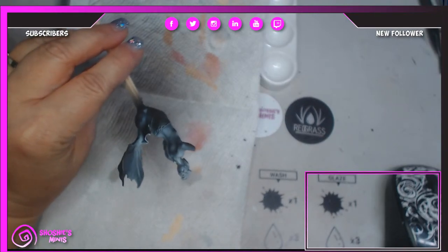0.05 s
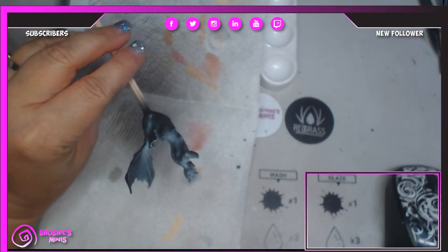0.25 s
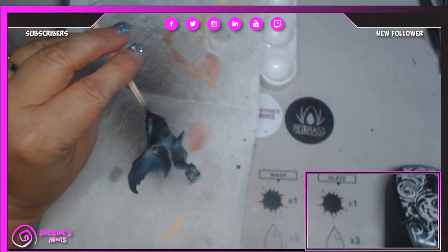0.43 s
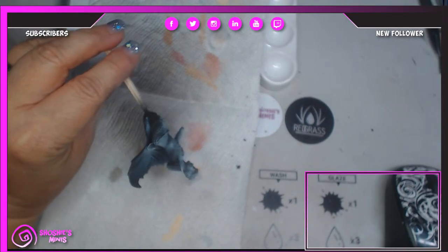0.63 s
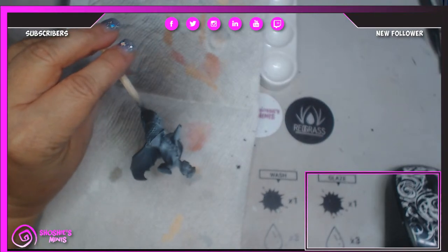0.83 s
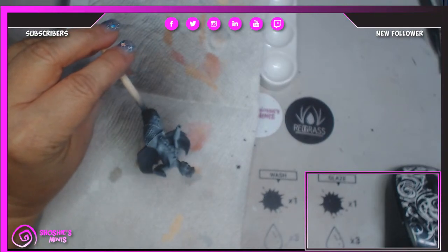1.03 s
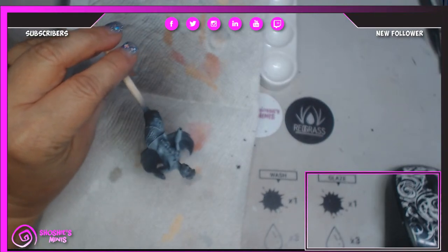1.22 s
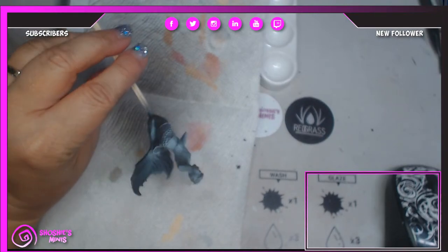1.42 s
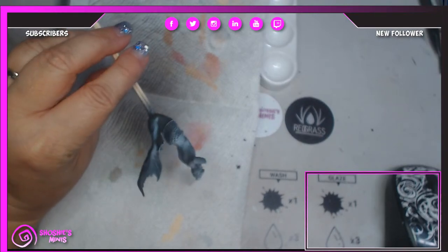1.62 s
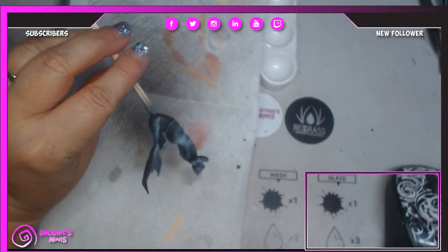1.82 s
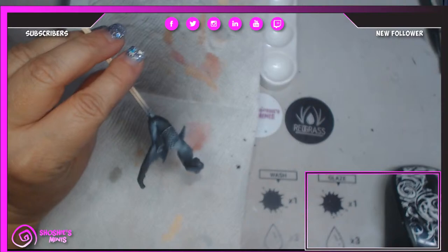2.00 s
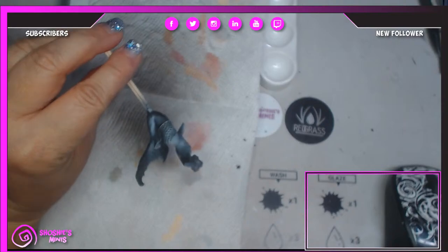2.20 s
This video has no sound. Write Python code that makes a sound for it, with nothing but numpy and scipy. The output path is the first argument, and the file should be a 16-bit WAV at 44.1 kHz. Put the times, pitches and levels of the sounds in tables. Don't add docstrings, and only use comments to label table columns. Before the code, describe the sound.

An airbrush is already hissing close to a desk microphone, a thin band of bright air without deep body, growing slightly until 1.1 s, over faint low nudges in the first 0.2 s. It drops abruptly to a weak, fluttering leak that fades further. From 1.6 to 2.1 s low desk thumps come, strongest near 1.8 s, with tiny high spits. The hiss is gated off after 2.07 s; full silence from about 2.2 s.

```python
import sys
import numpy as np
from scipy import signal
from scipy.fft import rfft, irfft, next_fast_len
from scipy.io import wavfile
from scipy.ndimage import uniform_filter1d, map_coordinates

SR = 44100
rng = np.random.default_rng(int(sys.argv[2]) if len(sys.argv) > 2 else 0)


def generate_wav(signal):
    frames = np.transpose(np.atleast_2d(signal))
    scaled = np.clip(frames, -1, 1) * 32767
    pcm = np.round(scaled).astype(np.int16)
    wavfile.write(sys.argv[1], SR, pcm)


N = 99269

# (time [s], level [dB])
TRIGGER_HISS = [(0, -50), (0.499, -48.5), (1.082, -46), (1.1, -61), (1.201, -62), (1.299, -63),
                (1.418, -64.5), (1.559, -69), (1.718, -69), (1.78, -66.5), (1.93, -66.5), (2.1, -69)]
# (frequency [Hz], density [dB per Hz])
FULL_JET_SPECTRUM = [(1120, -103.5), (1900, -62.5), (2220, -19), (2590, -11.5), (3510, -11.5),
                     (4000, -10.5), (6370, 0.5), (7490, -6), (7900, -36.5), (10300, -71.5), (17400, -120)]
# (frequency [Hz], density [dB per Hz])
LEAK_SPECTRUM = [(1290, -70.5), (2200, -35.5), (2880, -14), (3720, -16), (3940, -4.5), (4840, -13.5),
                 (7130, 1), (7480, -5), (7800, -31), (10100, -56.5), (17200, -120)]
# (frequency [Hz], width [Hz], level [dB], drift [dB per s])
FULL_JET_CAP = [(2870, 150, -14, 1.5), (4070, 360, -7, -1), (4445, 300, -9.5, -1), (5520, 490, -3, 1),
                (6120, 210, -7, -0.5), (6498, 300, 1.5, -1.5), (7080, 150, -5.5, 0), (7338, 220, -4, -0.5)]
# (frequency [Hz], width [Hz], level [dB], drift [dB per s])
LEAK_CAP = [(2925, 200, -19, 10), (3427, 170, -20, 7), (3967, 120, -9.5, 10.5), (4494, 170, -12, -5),
            (5384, 310, -9.5, -10), (5870, 120, -5, 2), (6530, 230, -0.5, -11), (7184, 380, -3, 3)]
# (time [s], length [s], share [0-1])
EDGE_BITES = [
    (.04, .2, .8),
    (.27, .1, .5),
    (.57, .07, .95),
    (.7, .05, .6),
    (1.14, .5, .85),
]
# (time [s], length [s], level [dB])
WHISTLES = [
    (0, 0.22, -87.5),
    (0.316, 0.076, -94),
    (0.599, 0.082, -88.5),
    (0.778, 0.21, -87),
]
# (time [s], level [dB])
DESK_SPELLS = [
    [(0, -56), (.09, -68.5), (.2, -69), (.236, -74), (.34, -69), (.42, -93.5), (.5, -106)],
    [(1.572, -105), (1.588, -62), (1.63, -50), (1.7, -56.5), (1.8, -52.5), (1.85, -47.5), (2.07, -53.5),
     (2.13, -75.5), (2.24, -102)],
]
# (frequency [Hz], density [dB per Hz])
RUMBLE_SPECTRUM = [(15, -45.5), (25, -17), (48, -6.5), (70, 9), (97, -6), (151, -6), (200, -22.5),
                   (260, -45.5), (440, -120)]
# (frequency [Hz], density [dB per Hz])
RATTLE_SPECTRUM = [(100, -30.5), (170, -1.5), (194, -2), (378, -23), (412, -23.5), (480, -52.5), (620, -81),
                   (1060, -120)]
# (time [s], peak level [dB], frequency [Hz])
DESK_NUDGES = [(.003, -53, 100), (.04, -52, 90), (.07, -57, 70), (.119, -51, 70), (.163, -53, 70),
               (.199, -51, 90), (1.6, -50, 100), (1.636, -44, 80), (1.667, -47, 70), (1.718, -51, 80),
               (1.749, -44, 80), (1.769, -45, 85), (1.8, -34, 78), (1.819, -43, 80), (1.847, -43, 95),
               (1.885, -39, 85), (1.914, -49, 90), (1.955, -46, 100), (1.982, -48, 90), (2.015, -45, 90),
               (2.034, -47, 90), (2.058, -47, 120), (2.084, -50, 80)]
# (time [s], length [s], level [dB], frequency [Hz])
ROOM_FLICKERS = [(.001, .12, -86, 608), (.011, .07, -97, 1150), (.05, .14, -92, 2150), (.18, .07, -99, 750),
                 (.2, .07, -97, 620), (.31, .05, -100, 610), (.46, .14, -90, 2040), (.5, .05, -94, 1070),
                 (.52, .05, -92, 650), (.58, .07, -89, 620), (.64, .06, -96, 1090), (.645, .19, -89, 770),
                 (.65, .12, -94, 2040), (.66, .17, -89, 610), (.745, .05, -96, 1170),
                 (1.12, .04, -102, 1120), (1.27, .04, -107, 1120), (1.44, .05, -89, 1140),
                 (1.94, .03, -96, 750), (2.166, .022, -87, 1150), (2.19, .035, -101, 1150)]
# (time [s], length [s], level [dB], frequency [Hz])
PAINT_SPURTS = [
    (1.61, .03, -68, 6550),
    (1.66, .04, -60, 6600),
    (1.72, .06, -63, 7250),
    (1.835, .03, -65, 6500),
    (1.912, .03, -58, 7280),
    (2.04, .04, -69, 7300),
    (1.075, .025, -84, 7950),
]
# (frequency [Hz], density [dB per Hz])
FLOOR_SPECTRUM = [(20, -8), (2000, 0.5), (8000, -6), (11000, -3.5), (15900, 4), (16100, -6.5),
                  (22000, -3.5)]

EASE_S, EASE_LEN_S = 1.092, 0.0034
AFTER_DB, AFTER_DB_PER_S = -64, 90
JET_LOW_HZ, JET_TOP_HZ, BITE_HZ = 2130, 7800, 2520
WANDER, WANDER_RATE = .008, 7
WHISTLE_HZ, WHISTLE_WIDTH_HZ = 8580, 100
RUMBLE_DB, STAND_HZ = -8, 32
RATTLE_DB, RATTLE_GROWS, RATTLE_S = -20.5, 1.74, 0.015
SUPPRESS_DB = -92.5
NUDGE_CYCLES, NUDGE_SKEW_RAD = .8, .6
FLICKER_DB, HUM_HZ, HUM_DB = -0.5, 60, -115
SPURT_DB, SPURT_WIDTH_HZ = -0.5, 49
GATE_S, GATE_DB_PER_S, END_S = 2.072, 551.5, 2.225
FLOOR_DB, FLOOR_SIDE_DB = -99, -29.5


def amp(db):
    return 10 ** (np.asarray(db) / 20)


def unit(x):
    return x / np.sqrt(np.mean(x ** 2) + 1e-20)


def along(points, x, warp=np.log1p):
    places, levels = np.transpose(points)
    return np.interp(warp(x), warp(places), levels, left=-150, right=-150)


def clock():
    return np.arange(N) / SR


def wobble(rate):
    knots = rng.standard_normal(int(N * rate / SR) + 4)
    return map_coordinates(knots, [np.arange(N) * rate / SR])


def swell(start, length):
    return np.sin(np.pi * np.clip((clock() - start) / length, 0, 1)) ** .5


def through(x, gain):
    size = next_fast_len(N + 8192)
    return irfft(rfft(x, size) * gain(np.fft.rfftfreq(size, 1 / SR)), size)[:N]


def coloured(gain):
    return unit(through(rng.standard_normal(N), gain))


def shaped(spectrum):
    return coloured(lambda f: amp(along(spectrum, f)))


def band(hz, width_hz):
    return coloured(lambda f: np.exp(-((f - hz) / width_hz) ** 2))


def smooth(cells, bins, frames):
    return uniform_filter1d(uniform_filter1d(cells, size=bins, axis=0), size=frames, axis=1)


def patchy(x, patchy_db):
    cells = signal.stft(x, nperseg=512)[2]
    patches = unit(smooth(rng.standard_normal(cells.shape), 4, 8))
    return unit(signal.istft(cells * amp(patchy_db * patches), nperseg=512)[1][:N])


def wandering(x):
    return map_coordinates(x, [np.cumsum(1 + WANDER * wobble(WANDER_RATE))], mode="mirror")


def suppressed(x, under_db):
    cells = signal.stft(x, nperseg=1024, noverlap=768)[2]
    size = smooth(np.abs(cells), 3, 3) + 1e-12
    kept = cells * np.clip(1 - amp(under_db) / size, 0, 1)
    return signal.istft(kept, nperseg=1024, noverlap=768)[1][:N]


def jet(spectrum, cap, middle_s, cap_db, waver_db, rate, patchy_db):
    air = patchy(shaped(spectrum), patchy_db)
    rings, ring_power = 0, 0
    for hz, width, db, drift in cap:
        level = amp(db + drift * (clock() - middle_s))
        waver = unit(amp(waver_db * wobble(rate)))
        rings = rings + level * waver * np.sqrt(width) * wandering(band(hz, 0.59 * width))
        ring_power += amp(2 * db) * width
    return (air + amp(cap_db) * rings / np.sqrt(ring_power)) / np.sqrt(1 + amp(2 * cap_db))


def airbrush_hiss():
    t = clock()
    weak = np.clip((t - EASE_S) / EASE_LEN_S, 0, 1)
    full = jet(FULL_JET_SPECTRUM, FULL_JET_CAP, middle_s=0.18, cap_db=-2, waver_db=-0.5, rate=25, patchy_db=3.5)
    full = full * amp(0.72 * wobble(60))
    leak = jet(LEAK_SPECTRUM, LEAK_CAP, middle_s=1.553, cap_db=4.5, waver_db=1.5, rate=28, patchy_db=4.5)
    leak = leak * amp(1.4 * wobble(45))
    times, levels = np.transpose(TRIGGER_HISS)
    hiss = amp(np.interp(t, times, levels)) * ((1 - weak) * full + weak * leak)
    hiss += weak * full * amp(AFTER_DB - AFTER_DB_PER_S * np.abs(t - EASE_S))

    lower_edge = through(hiss, lambda f: np.clip((BITE_HZ - f) / 200, 0, 1))
    bitten = lower_edge * sum(share * swell(s, length) for s, length, share in EDGE_BITES)

    def pass_band(f):
        return np.clip((JET_TOP_HZ - f) / 150, 0, 1) * np.clip((f - JET_LOW_HZ) / 120, 0, 1)
    return through(hiss - bitten, pass_band)


def whistle():
    level = sum(amp(db) * swell(s, length) for s, length, db in WHISTLES)
    return band(WHISTLE_HZ, WHISTLE_WIDTH_HZ) * level


def desk():
    t = clock()
    spells = [along(spell, t, warp=np.asarray) for spell in DESK_SPELLS]
    db = uniform_filter1d(np.maximum(*spells), size=300)
    rumble = amp(db + RUMBLE_DB) * shaped(RUMBLE_SPECTRUM)
    shaken, nudges = amp(db - 3), 0
    for s, peak_db, hz in DESK_NUDGES:
        since = t - s
        shaken = shaken + amp(RATTLE_GROWS * (peak_db + 43) - 45) * np.exp(-(since / RATTLE_S) ** 2)
        bump = np.exp(-(since * hz / NUDGE_CYCLES) ** 2)
        nudges = nudges - amp(peak_db) * bump * np.cos(2 * np.pi * hz * since - NUDGE_SKEW_RAD)
    rattle = amp(RATTLE_DB + 1.9 * wobble(30)) * shaken * shaped(RATTLE_SPECTRUM)
    thumps = rumble + suppressed(rattle, SUPPRESS_DB) + nudges
    return through(thumps, lambda f: f ** 3 / (f ** 3 + STAND_HZ ** 3))


def room():
    t = clock()
    hum = amp(HUM_DB + 2.5 * wobble(20)) * np.sin(2 * np.pi * HUM_HZ * t)
    flickers = 0
    for s, length, db, hz in ROOM_FLICKERS:
        fade_db = -7 * np.clip((t - s) / length, 0, 1)
        level = amp(db + FLICKER_DB + 5.0 * wobble(50) + fade_db)
        flickers = flickers + level * swell(s, length) * band(hz, 51)
    return flickers + hum


def paint_spurts():
    spurts = 0
    for s, length, db, hz in PAINT_SPURTS:
        ring = np.sin(2 * np.pi * hz * clock()) + 0.31 * band(hz, SPURT_WIDTH_HZ)
        spurts = spurts + amp(db + SPURT_DB) * swell(s, length) ** 2 * ring
    return spurts


def scene():
    gate = amp(-GATE_DB_PER_S * np.clip(clock() - GATE_S, 0, 1))
    airbrush = airbrush_hiss() + whistle() + paint_spurts()
    return np.tile(airbrush * gate + desk() + room(), (2, 1))


def record(dry):
    mid, side = shaped(FLOOR_SPECTRUM), shaped(FLOOR_SPECTRUM)
    hiss = amp(FLOOR_DB) * (mid + amp(FLOOR_SIDE_DB) * np.outer([1, -1], side))
    fade = amp(-120 * np.clip(clock() - 2.13, 0, 1))
    return (dry + hiss * fade) * (clock() < END_S)


dry = scene()
out = record(dry)
generate_wav(out)
```